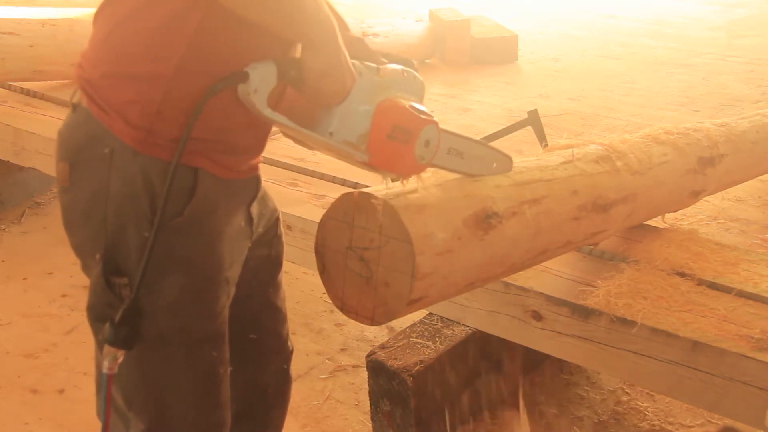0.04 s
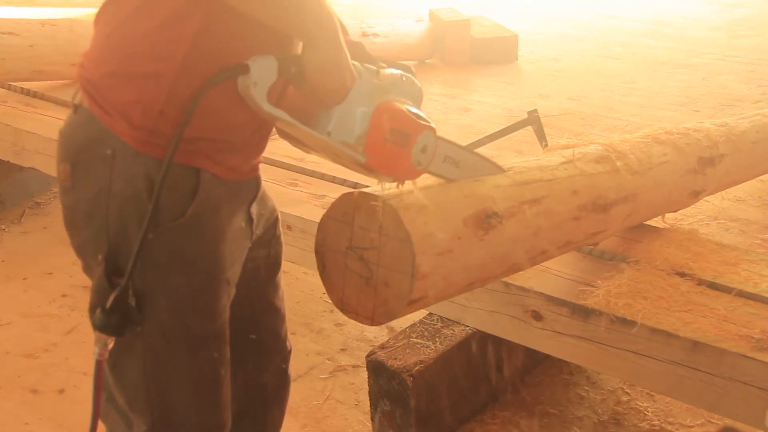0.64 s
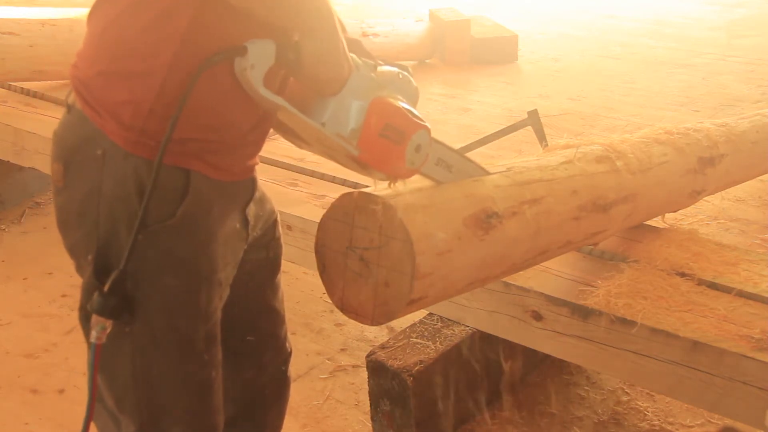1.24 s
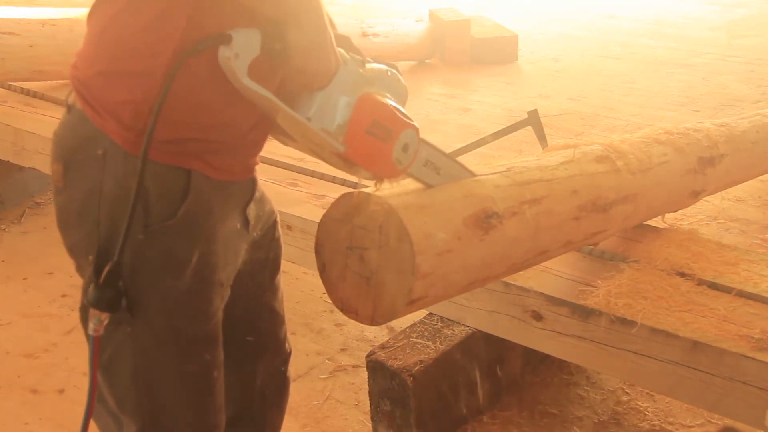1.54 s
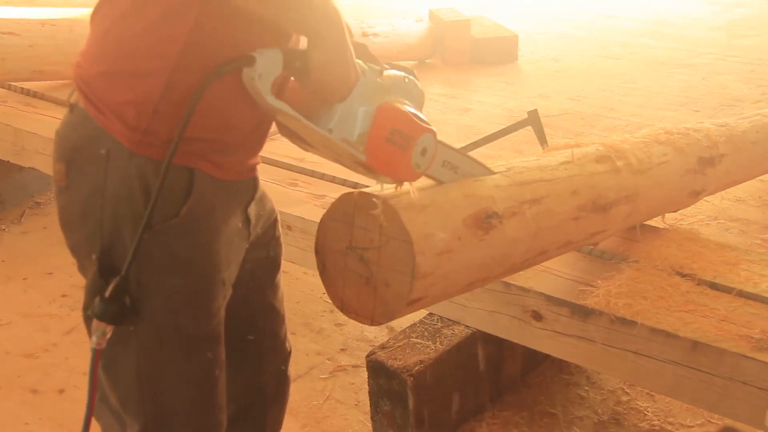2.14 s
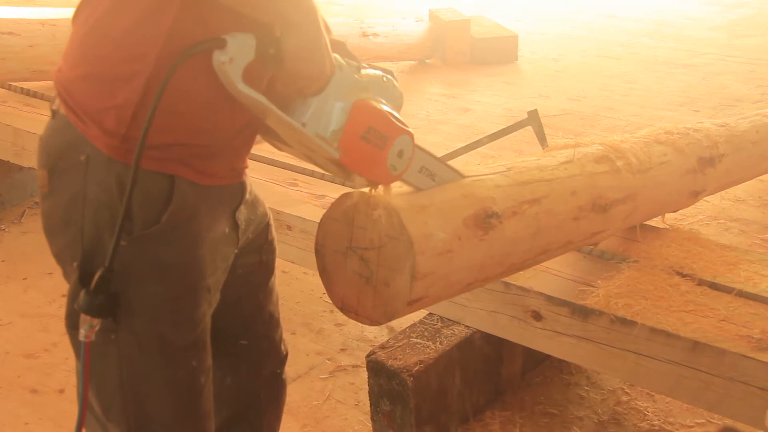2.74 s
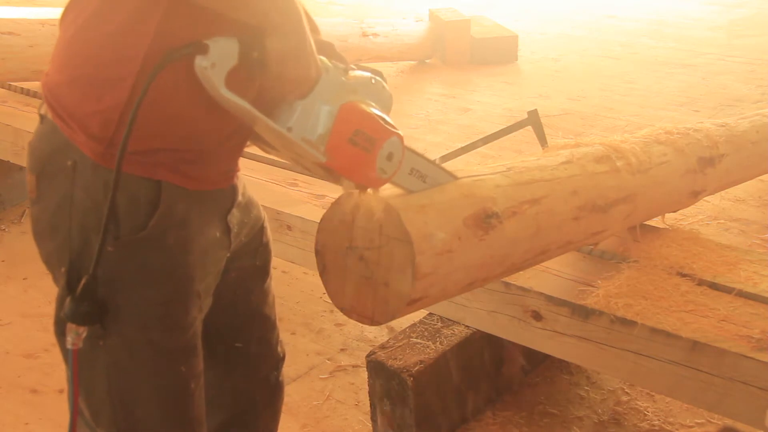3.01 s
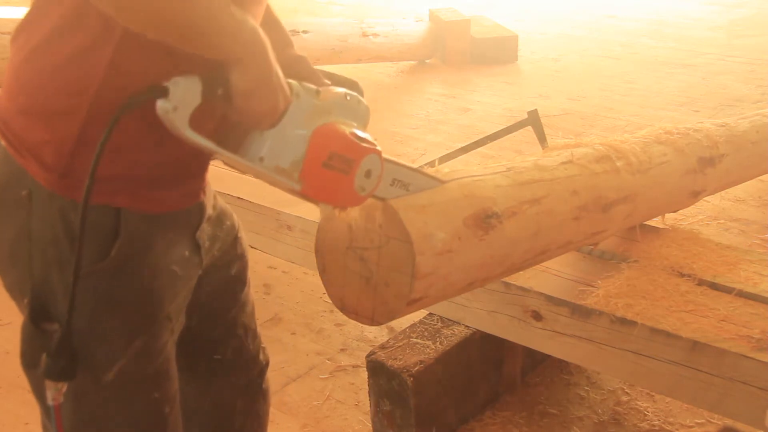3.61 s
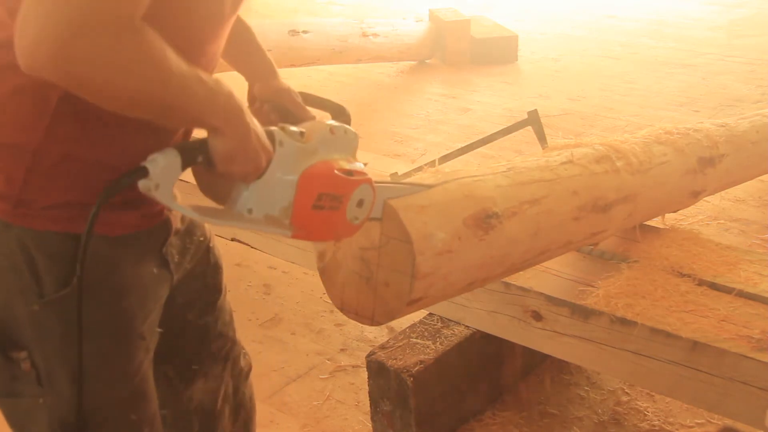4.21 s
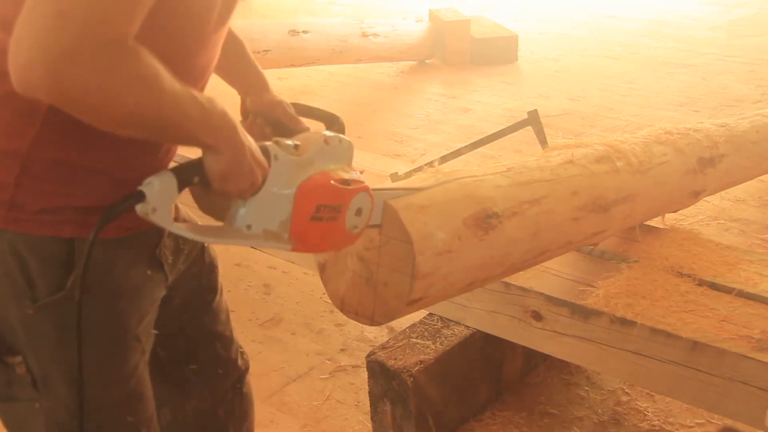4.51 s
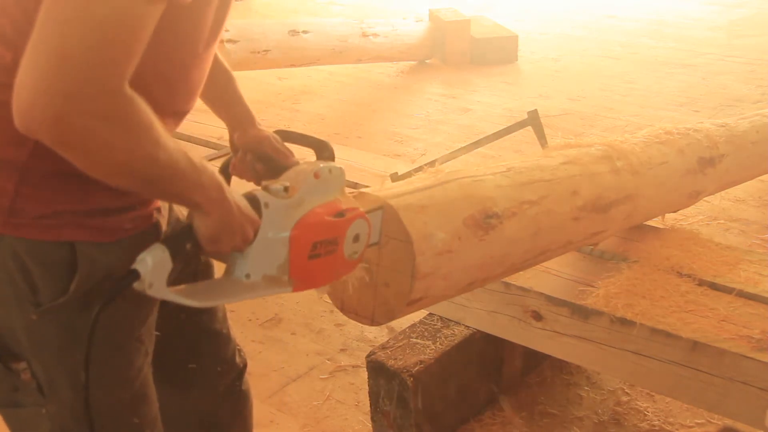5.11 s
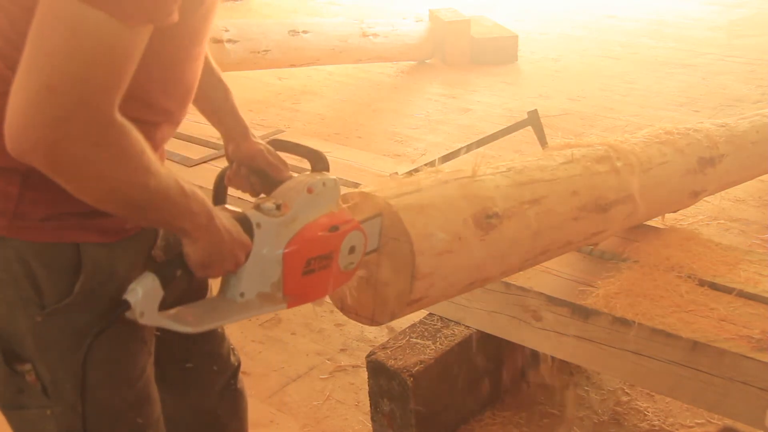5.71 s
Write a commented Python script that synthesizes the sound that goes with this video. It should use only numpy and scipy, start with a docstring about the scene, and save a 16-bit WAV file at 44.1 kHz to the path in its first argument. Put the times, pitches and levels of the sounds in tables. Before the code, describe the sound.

A corded electric chainsaw grinds through a log, its motor whine sinking as the bar presses deeper.

```python
"""An open work yard, the microphone a metre and a half from a corded electric chainsaw on a peeled log.
The chain enters grinding: cutters knock and tear the wood, links slap round the sprocket, the motor whines.
From about 1 s the kerf pinches the steel bar, which sings in short spells; near 4 s the log drones faintly.
As the bar is pressed in the motor sags, and whine, gear note and chain note sink with it, lowest near 5 s.
In the last half second the speed picks up a little and hard chips tick against the sprocket cover."""
import sys
import numpy as np
from scipy import signal
from scipy.fft import rfft, irfft
from scipy.io import wavfile

SR = 44100
rng = np.random.default_rng(int(sys.argv[2]) if len(sys.argv) > 2 else 0)


def unload_wav(signal):
    """Save mono or channel-first audio to the path in sys.argv[1] as 16-bit WAV at rate SR, clipped to [-1, 1]."""
    wavfile.write(
        sys.argv[1],
        SR,
        np.round(np.clip(np.atleast_2d(signal).T, -1, 1) * 32767).astype(np.int16),
    )


N = 253575
TIME = np.arange(N) / SR
PINION_TEETH, WHEEL_TEETH, SPROCKET_TEETH, COMMUTATOR_BARS = 9, 34, 7, 20


# cutters bite harder (+) or lose grip (-), and near 5.48 s the level dips briefly: (time [s], length [s], knock
# change [dB], hiss change [dB])
CUTTER_BITES = [(0, .16, 0.5, -1.5), (.26, 0.16, 1, 0.5), (.42, 0.046, -1, 0), (2.02, 0.25, 1.5, 2),
                (2.2, .08, 0, -1), (2.7, 0.4, 0, 0), (3.3, 0.74, 1, 1.2), (4.1, 0.48, 0.5, 1),
                (4.85, 0.21, 2.5, 0), (5.17, .1, -2, 0), (5.42, 0.098, 0, 2), (5.485, 0.046, -4, -3)]
def cutting(links, load, depth):
    """Every second link carries a cutter that works the wood; load, depth and bite set the levels."""
    knock_db, hiss_db = swells(CUTTER_BITES)
    entry_db = 6 * np.exp(-TIME / .47)  # extra grinding until the kerf guides the bar
    knock = undb(-25 + .31 * load + knock_db) * wood_knock(links)
    rasp = undb(-22 - 2 * load - .45 * depth + hiss_db) * wood_rasp(links)
    grind = undb(-31.5 + 4.6 * load + .5 * knock_db + entry_db) * cutter_grind(links)
    rattle = undb(-23.5 - 1.85 * load + 4.4 * depth + 1.1 * hiss_db) * link_rattle(links, depth)
    return knock + rasp + grind + rattle


# body of the knocked log: (frequency [Hz], relative level [dB])
KNOCK_SPECTRUM = [(30, -68), (70, -40), (125, -37), (190, -47.5), (245, -11.5), (320, -6), (480, -6),
                  (640, 1.5), (780, 0.5), (950, 1), (1200, 0.5), (1500, -2), (2100, -3.5), (3000, -16),
                  (6000, -38)]
def wood_knock(links):
    """Each cutter knocks the log, and the yard answers."""
    knocks = strikes(links / 2, decay=.24, scatter_db=2, late=.25, slide=1.66)
    return yard(colour(knocks, KNOCK_SPECTRUM), wet_db=-7, drift_s=.0008)


# hiss of tearing wood: (frequency [Hz], relative level [dB])
RASP_SPECTRUM = [(300, -36), (1500, -9), (2600, -4), (3400, -4), (4200, 1), (5200, 0.5), (6800, 0),
                 (7800, -3.5), (10000, -12), (16000, -24)]
def wood_rasp(links):
    """The chain tears out chips in bright bursts at the link rate."""
    tears = strikes(links, decay=.23, scatter_db=2, late=.17, slide=1.33)
    return yard(colour(tears, RASP_SPECTRUM), wet_db=-9.5, drift_s=.0004)


# grinding in the kerf: (frequency [Hz], relative level [dB])
GRIND_SPECTRUM = [(170, -38), (380, -11.5), (650, 8), (1050, -35), (1420, 5.5), (2000, -14), (2750, 1.5),
                  (3600, -1), (5000, -14), (9000, -17.5)]
def cutter_grind(links):
    """The cutters grind in long, very uneven strokes."""
    return colour(strikes(links / 2, decay=1, scatter_db=8, late=.13, slide=1.3), GRIND_SPECTRUM)


# links on the bar: (frequency [Hz], relative level [dB])
RATTLE_SPECTRUM = [(1000, -49), (4000, -6.5), (7000, -13), (8200, 2.5), (9200, 5.5), (10500, 3.5),
                   (12300, 3), (13500, 1), (15000, -4.5), (16000, -10.5)]
def link_rattle(links, depth, open_top_db=3.5, shade_db=-21):
    """All links rattle along the bar; deep in the kerf the log hides their highest treble."""
    tension = undb(1.1 * np.sin(2 * np.pi * 2 * links / SPROCKET_TEETH))  # taut twice per sprocket turn
    slaps = tension * strikes(links, decay=.33, scatter_db=1.2, late=.05, slide=1.15)
    rattle = colour(slaps, RATTLE_SPECTRUM)
    top = signal.sosfiltfilt(signal.butter(2, 11500, "high", fs=SR, output="sos"), rattle)
    top_gain = undb(open_top_db + shade_db * depth)
    return undb(.5 * walk(rate_hz=12)) * (rattle + (top_gain - 1) * top)


# the chain pulls taut (+) or runs slack (-), and near 5.42 s the level dips briefly: (time [s], length [s],
# level change [dB])
CHAIN_TUGS = [(.05, .15, -9), (1.18, 0.11, 4), (1.65, .07, -5), (2.82, .1, -6), (3.68, .14, -8),
              (4.78, .14, 2.5), (5.42, .08, -11), (5.58, 0.069, 1.5)]
# overtones of the chain: (multiple of link rate, relative level [dB])
CHAIN_BUZZ = [(2, -33.5), (3, -44.5), (4, -39.5), (5, -38.5), (6, -43), (9, -44), (10, -54)]
def chain_note(links, link_hz, load):
    """Each link lands on the sprocket and jerks the chain: a clear note with rough, buzzing overtones."""
    tug_db, = swells(CHAIN_TUGS)
    note = undb(-27.5 + housing(link_hz) + tug_db) * tone(links, flutter=.13, flutter_hz=45)
    buzz = sum(undb(db) * tone(k * links, flutter=.25, flutter_hz=25) for k, db in CHAIN_BUZZ)
    return note + undb(-1.3 + 1.5 * load) * buzz


# the whine swells and drops out: (time [s], length [s], level change [dB])
BRUSH_SWELLS = [(.13, .06, -9), (.19, 0.054, 5), (.33, 0.092, -4), (.46, .12, 7.5), (.56, .08, 5),
                (.65, 0.083, -12), (.75, .07, 7), (.86, 0.054, -14), (1.19, 0.16, -9), (1.65, .14, 5),
                (1.88, 0.17, -3), (2.29, 0.079, -8), (2.72, .2, -2), (3.72, .16, 5), (4.36, .12, -4),
                (4.76, .14, 7)]
# partials of the rotor: (multiple of motor speed, level without load [dB])
ROTOR_PARTIALS = [(2, -41.5), (4, -60), (6, -48), (8, -47), (10, -41)]
def motor(turns, speed_hz, load):
    """Brushes whine on the commutator, the rotor hums and the pinion sings against its wheel."""
    swell_db, = swells(BRUSH_SWELLS)
    flicker_db = 1.6 * walk(rate_hz=18)
    whine_db = -27 + housing(COMMUTATOR_BARS * speed_hz) - 2.5 * load + swell_db + flicker_db
    gear_db = -28 + housing(PINION_TEETH * speed_hz)
    # the brushes chatter, which frays the whine and shows most when it is weak
    fray = undb(.5 * whine_db - 23.5) * tone(COMMUTATOR_BARS * turns, flutter=3, flutter_hz=230)
    whine = undb(whine_db) * tone(COMMUTATOR_BARS * turns, flutter=.22, flutter_hz=70)
    gear = undb(gear_db) * tone(PINION_TEETH * turns, flutter=.35, flutter_hz=50)
    hum = undb(-28 + housing(speed_hz)) * tone(turns, flutter=.15, flutter_hz=20)
    rotor = sum(undb(db) * tone(k * turns, flutter=.21, flutter_hz=22) for k, db in ROTOR_PARTIALS)
    return whine + fray + gear + hum + undb(-3 * load) * rotor


# the motor shaft through the cut: (time [s], speed [turns/s])
SHAFT_SPEED = [(0.0, 462), (0.15, 464.4), (0.31, 453), (0.54, 450), (0.76, 443.2), (0.84, 447.8),
               (1.08, 435.2), (1.42, 426), (1.63, 422.3), (1.9, 440.4), (2.14, 442.3), (2.37, 447.3),
               (2.54, 430.9), (2.86, 415.5), (3.28, 412.3), (3.86, 418.2), (4.21, 396.4), (4.53, 399.6),
               (4.77, 383.6), (4.96, 367.9), (5.16, 366.4), (5.58, 382.1), (5.75, 397)]
def shaft(free_hz=465, labouring_hz=368):
    """Turns, speed and load of the shaft: the further the speed sags, the greater the load."""
    speed_hz = np.interp(TIME, *np.transpose(SHAFT_SPEED))
    load = ((free_hz - speed_hz) / (free_hz - labouring_hz)) ** 2
    turns = np.cumsum(speed_hz * (1 + .0006 * walk(rate_hz=25))) / SR
    return turns, speed_hz, load


# resonances of the saw's housing: (frequency [Hz], width [Hz], gain [dB])
HOUSING_MODES = [(388.2, 23.3, -7.5), (420.7, 34, -8), (457.3, 13, -7), (713, 73, 1.5), (810, 70, 0.5),
                 (3307, 92, 1), (3480, 550, -6), (8530, 1620, 1.5)]
def housing(hz):
    """Gain in dB that the housing gives a tone as the speed carries it through the resonances."""
    power = sum(undb(db) ** 2 / (1 + (2 * (hz - centre_hz) / width_hz) ** 2) ** 2
                for centre_hz, width_hz, db in HOUSING_MODES)
    return 10 * np.log10(power)


# the kerf pinches the bar: (time [s], length [s], relative level [dB], pitch [Hz])
BAR_PINCHES = [(1.15, .25, -32, 4100), (1.7, .38, -31, 4490), (2.02, .17, -27.5, 4540),
               (2.7, .4, -35, 4530), (3.03, .11, -29.5, 4600), (3.547, 0.14, -29, 4630),
               (4.3, 0.22, -32, 4413)]
def bar_song():
    """The steel bar rings where the kerf pinches it: a pitched core in a rough band."""
    song = 0
    for s, length_s, db, hz in BAR_PINCHES:
        steel = .85 * ring(hz, width_hz=80) + .8 * ring(hz, width_hz=400)
        song = song + undb(db) * swell(s, length_s) * steel
    return song


# hard chips striking the cover: (time [s], relative level [dB])
CHIP_HITS = [(5.35, -3), (5.449, -5), (5.461, -10), (5.639, -13), (5.711, -8)]
def chip_ticks(decay_s=.00064):
    """Hard chips tick against the sprocket cover."""
    envelope = sum(undb(db) * (TIME >= s) * np.exp(-np.abs(TIME - s) / decay_s) for s, db in CHIP_HITS)
    band = signal.butter(2, (1500, 9000), "band", fs=SR, output="sos")
    return undb(-6) * signal.sosfilt(band, envelope * rng.standard_normal(N))


# the log drones on its trestle: (time [s], length [s], level [dB])
LOG_DRONES = [(3.857, .28, -48.5), (4.383, 0.11, -47)]
def log_boom(settle_s=1.25):
    """The shaken log booms faintly and unevenly, building up as the saw settles on it."""
    boom_db = -60 - 10 * np.exp(-(TIME / settle_s) ** 2)
    drone = undb(-69) + sum(undb(db) * swell(s, length_s) for s, length_s, db in LOG_DRONES)
    boom = ring(122, width_hz=40) + undb(-16.5) * ring(75, width_hz=24)
    lurch_db = 3.5 * walk(rate_hz=18)
    return undb(boom_db + lurch_db) * boom + drone * ring(192, width_hz=30)


def yard(x, wet_db, drift_s):
    """Planks, ground and log throw short echoes to the microphone; their paths drift as the saw moves."""
    sway_s, echoes = drift_s * walk(rate_hz=.6), 0
    for delay_s, share in rng.uniform((.002, -1), (.02, 1), size=(6, 2)):
        index = np.rint((TIME - delay_s - share * sway_s) * SR).astype(int)
        echoes = echoes + x[index % N]
    return unit(x + undb(wet_db) * unit(echoes))


def strikes(cycles, decay, scatter_db, late, slide):
    """One uneven burst of noise per cycle over steady sliding; decay and late are in cycles."""
    size, delay = rng.uniform(-1, 1, (N // 20, 2)).T * np.sqrt(3)
    start = np.arange(len(size)) + np.clip(late * delay, -.45, .45)
    start[0] = 0
    index = np.searchsorted(start, cycles, side="right") - 1
    burst = unit(undb(scatter_db * size[index]) * np.exp(-(cycles - start[index]) / decay))
    return unit(rng.standard_normal(N) * np.sqrt(burst ** 2 + slide ** 2))


def tone(cycles, flutter, flutter_hz):
    """A partial whose strength and phase flutter as the saw shakes."""
    shake = 1 + flutter * (walk(flutter_hz) + 1j * walk(flutter_hz))
    return unit(np.real(shake * np.exp(2j * np.pi * (cycles + rng.random()))))


def ring(hz, width_hz):
    """A resonance shaken at random."""
    phase = 2 * np.pi * hz * TIME
    return unit(walk(width_hz) * np.cos(phase) + walk(width_hz) * np.sin(phase))


def colour(x, spectrum):
    """Shape a sound by (frequency [Hz], level [dB]) points; rms 1."""
    hz, db = np.transpose(spectrum)
    f = np.maximum(np.arange(N // 2 + 1) * SR / N, 1)
    gain = undb(np.interp(np.log(f), np.log(hz), db))
    return unit(irfft(rfft(x) * gain, N))


def walk(rate_hz):
    """A smooth random curve of rms 1 that changes about rate_hz times a second."""
    f = np.arange(N // 2 + 1) * SR / N
    return unit(irfft(rfft(rng.standard_normal(N)) / (1 + (f / rate_hz) ** 2) ** 2, N))


def swell(s, length_s):
    """A smooth rise and fall around s, above about half height for length_s."""
    return np.exp(-np.pi * ((TIME - s) / length_s) ** 2)


def swells(table):
    """Sum (time [s], length [s], change [dB], ..) events into one curve for each dB column."""
    return sum(np.outer(db, swell(s, length_s)) for s, length_s, *db in table)


def undb(db):
    """Decibels to gain."""
    return 10 ** (np.asarray(db) / 20)


def unit(x):
    """Scale to rms 1."""
    return x / np.sqrt(np.mean(x ** 2))


def scene():
    """One shaft drives motor and chain; the saw stands dead centre before the microphone."""
    turns, speed_hz, load = shaft()
    depth = (TIME / TIME[-1]) ** 3.4  # the bar sinks slowly at first, then faster
    links_per_turn = PINION_TEETH / WHEEL_TEETH * SPROCKET_TEETH
    links, link_hz = turns * links_per_turn, speed_hz * links_per_turn
    saw = motor(turns, speed_hz, load) + chain_note(links, link_hz, load) + cutting(links, load, depth)
    sound = saw + bar_song() + log_boom() + chip_ticks()
    return np.array([sound, sound])


def record(dry):
    """The recorder cuts the top steeply, just under 16 kHz."""
    return signal.sosfilt(signal.ellip(12, .1, 90, 15950, fs=SR, output="sos"), dry)


dry = scene()
out = record(dry)
unload_wav(out)
```